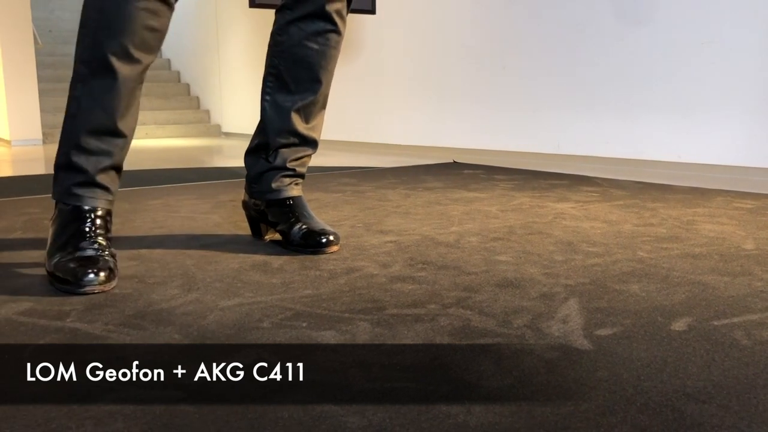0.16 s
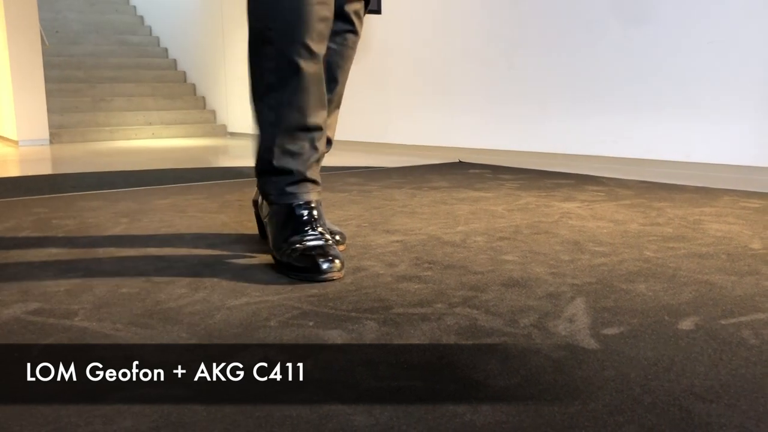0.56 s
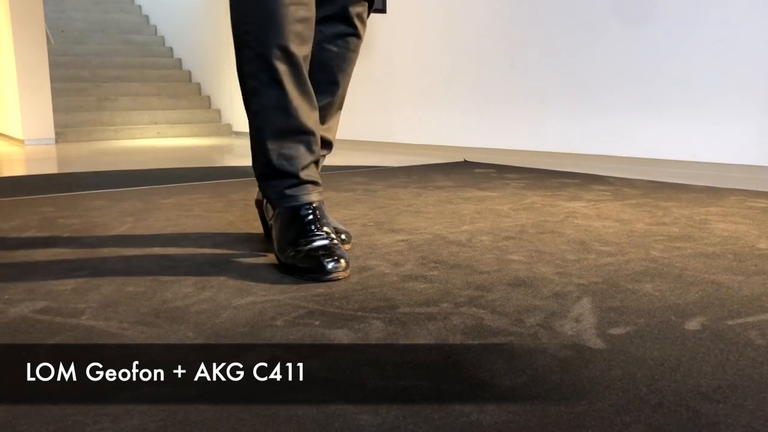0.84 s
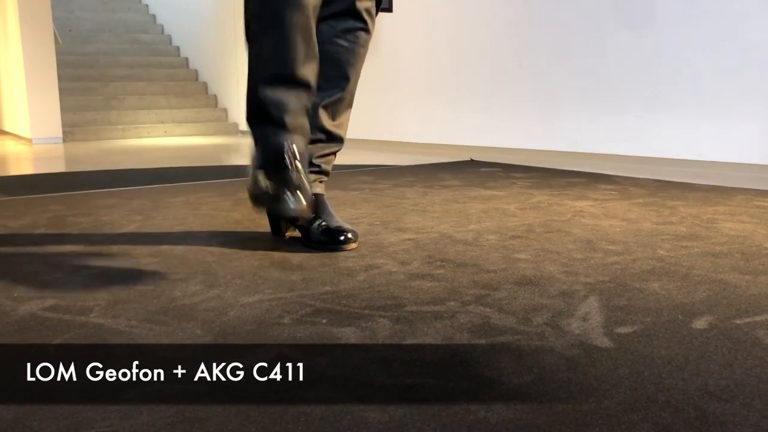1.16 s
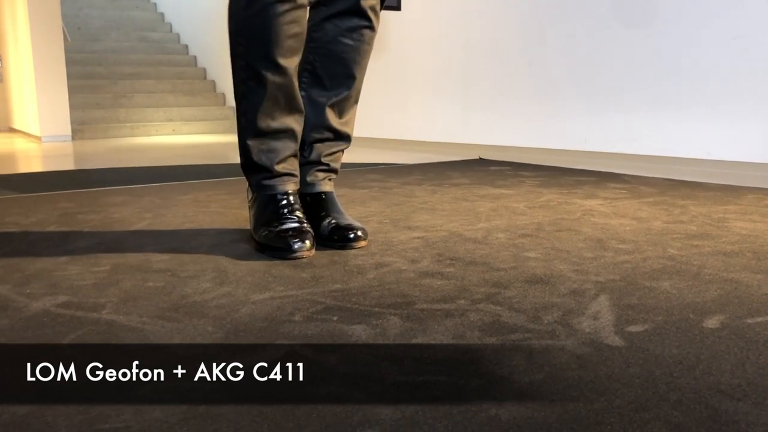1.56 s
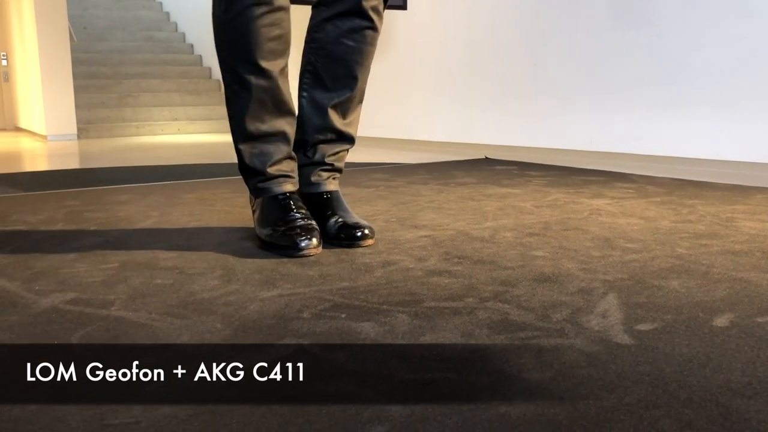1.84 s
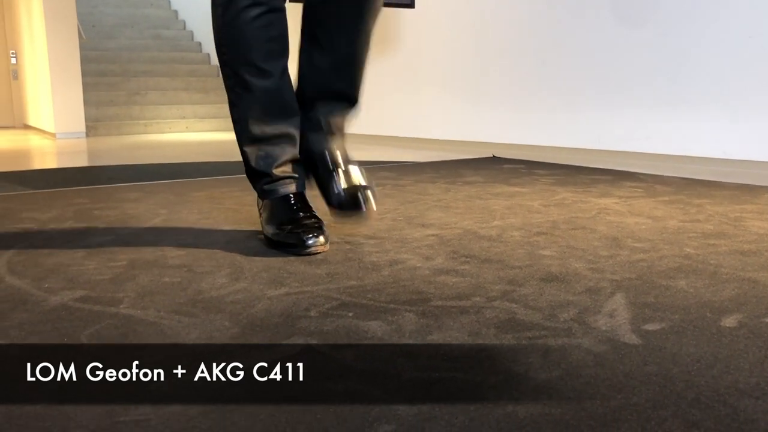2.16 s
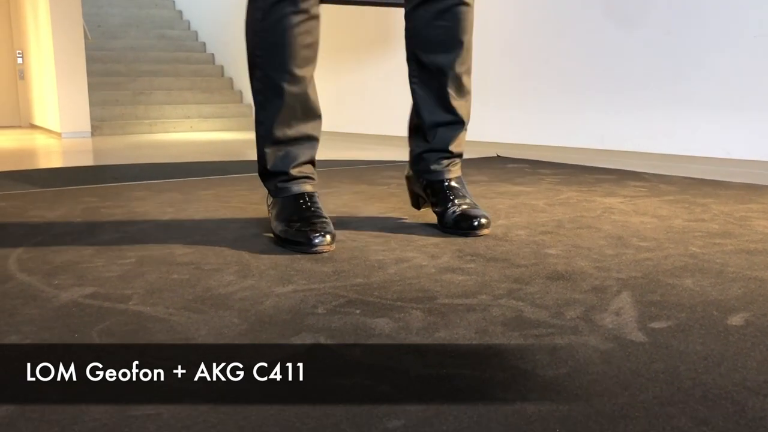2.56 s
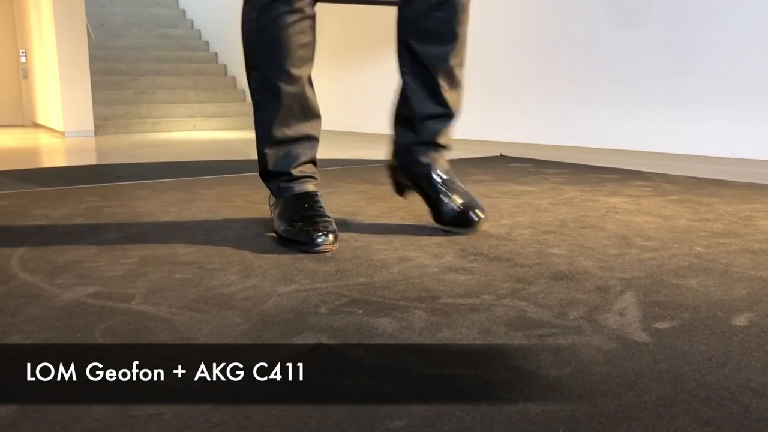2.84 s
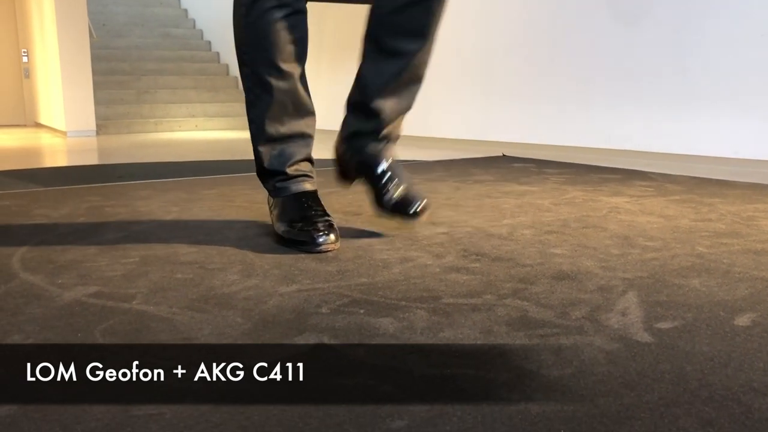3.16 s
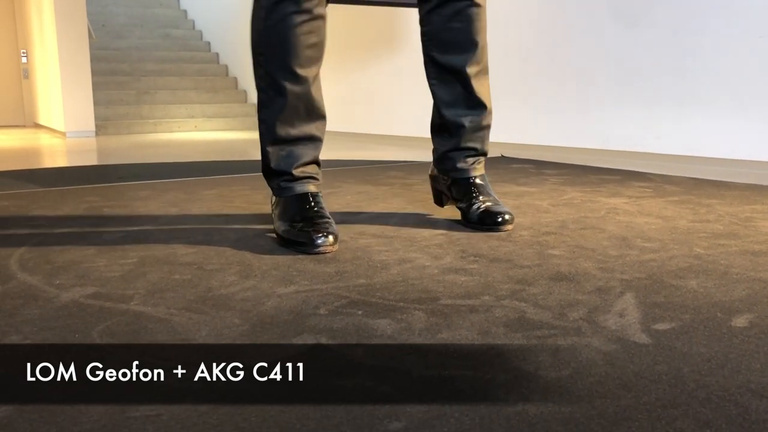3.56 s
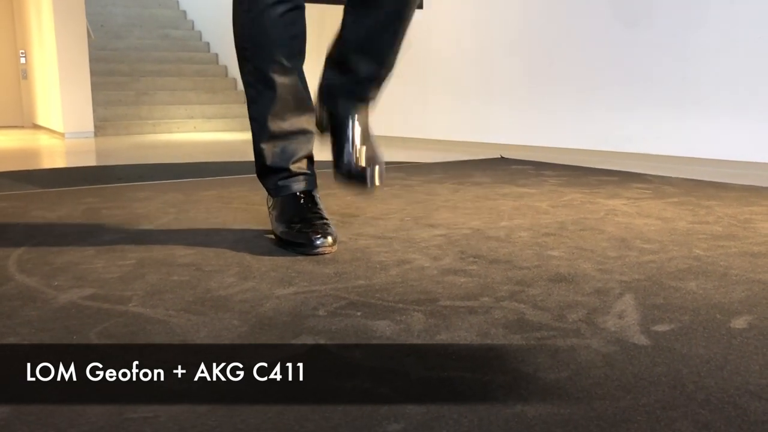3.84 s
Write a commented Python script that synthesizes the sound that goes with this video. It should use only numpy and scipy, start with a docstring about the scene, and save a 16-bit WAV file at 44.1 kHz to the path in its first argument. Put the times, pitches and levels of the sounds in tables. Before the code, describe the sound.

Seven forceful heel stamps on resonant boards, each a woody knock with clatter and a short booming tail, then small ticks, dull touches and soft scuffs; very close pickup, slight hall reflection, faint low rumble.

```python
"""In a hall, a dancer stamps hard-heeled shoes on a hollow wooden stage, heard close to the boards.
Each stamp is a pulse and short ringing modes in the wood, a bright crack a few ms later, and a boom
of swelling platform modes; banded noise with its own decay in each band gives clatter and hall.
Between stamps come lighter taps, ticks, dull heel touches, soft steps and sole scuffs, over a faint rumble."""
import sys
import numpy as np
from scipy import signal
from scipy.io import wavfile

SR = 44100
rng = np.random.default_rng(int(sys.argv[2]) if len(sys.argv) > 2 else 0)


def generate_wav(signal):
    """Clip the signal to [-1, 1] and save it as 16-bit WAV at the path in sys.argv[1]."""
    frames = np.transpose(np.atleast_2d(signal))
    scaled = np.clip(frames, -1, 1) * 32767
    pcm = np.round(scaled).astype(np.int16)
    wavfile.write(sys.argv[1], SR, pcm)


N = 176400
LEAD = SR // 4  # samples computed ahead of time zero, so that earlier blows still ring
TIME = np.arange(-LEAD, N) / SR

# All levels are relative. Decay times T60 are the time to fall by 60 dB.
# Stamps. Each row: start in seconds, knock level in dB, knock frequency in Hz, boom level in dB,
# board clatter level in dB, heel ring level in dB, heel ring pitch in Hz, crack delay in seconds,
# crack level in dB, hall level in dB, rebound level in dB, rebound delay in seconds.
STAMP_EVENTS = [(-.066, 5, 784, 2, -17.5, -30, 545, 0.019, 1, -6.5, -28.5, .126),
                (0.5667, -9, 972, 1, 0, -33.5, 747, 0.0081, -10.5, -3, -19, .083),
                (1.4252, -10, 1020, 2.5, 3, -31.5, 590, .0075, 1.5, -2.5, -25, .131),
                (2.2524, -13, 722, -0.5, -1.5, -25, 534, 0.0046, -2.5, -11.5, -24, 0.079),
                (2.5323, -17.5, 612, 1, 3.5, -21.5, 556.5, .005, 1.5, -3.5, -21.5, 0.081),
                (3.0733, -12.5, 773, 1, 0.5, -25, 547, .0072, 0.5, -8, -24.5, .082),
                (3.3643, -12.5, 900, 2.5, 2, -23.5, 548, 0.0047, 0, -4, -20, 0.077),
                (3.9325, -8, 1078, 3.5, 5, -33.5, 580, 0.0044, 0, 1.5, -22, .081)]
# Lighter taps as the sole settles. Each row: start in seconds, click level in dB, thud level in dB.
TAP_EVENTS = [(0.019, -33, -13.5), (0.031, -13.5, -13.5), (0.581, -7, -20.5), (.613, -25, -6),
              (.628, -17, -12.5), (1.497, -20, -14.5), (1.5227, -26, -14.5), (1.5311, -11, -9),
              (2.297, -12.5, -12), (3.112, -7, -15.5), (3.394, -6.5, -5)]
# Small ticks of the shoes. Each row: start in seconds, level in dB.
TICK_EVENTS = [(0.2623, -36), (0.471, -42), (.51, -45), (0.646, -24), (0.6665, -18), (0.783, -48),
               (0.8561, -44), (1.1522, -40), (1.509, -27.5), (1.7109, -44), (1.879, -45.5), (2.326, -36),
               (2.3594, -36), (2.618, -26), (2.815, -39), (3.149, -19), (3.176, -30.5), (3.453, -29),
               (3.4862, -33.5), (3.5123, -35.5), (3.6589, -37)]
# Light dull touches of the heel. Each row: start in seconds, level in dB.
TOUCH_EVENTS = [(1.8795, -10), (2.659, -1), (3.6184, -8)]
# Soft steps and shifts of weight. Each row: start in seconds, length in seconds, level in dB,
# board hum level in dB, hum frequency in Hz.
STEP_EVENTS = [(.243, .04, 0, -45, 186.8), (0.5, 0.055, -0.5, -47, 191.5), (1.025, 0.018, 4, -42.5, 159.6),
               (1.872, 0.0066, 3, -54.5, 157.2), (1.964, 0.017, 4.5, -37.5, 188.6),
               (1.995, 0.051, -4.5, -38, 156.2), (2.82, 0.034, 0, -61, 193.6),
               (3.623, 0.011, -13, -54.5, 195)]
# Scuffs of the sole. Each row: middle in seconds, half length in seconds, level in dB.
SCUFF_EVENTS = [(0.274, 0.011, -8.5), (1.033, 0.0137, 1), (1.993, 0.0076, -10.5), (2.848, 0.015, -9.5),
                (3.682, 0.01, -5.5)]

# Modes of the heel on the board. Each row: multiple of the ring pitch, level in dB, T60 in seconds.
HEEL_MODES = [(.61, -9, 0.055), (1, 2.5, 0.09), (1.24, -7.5, .05), (2.2, -5, 0.046)]
# Modes of the hollow platform. Each row: frequency in Hz, level in dB, T60 in seconds,
# swell time constant in seconds.
PLATFORM_MODES = [(30, -42, 0.19, 0.046), (54, -49, 0.12, 0.073), (74.22, -18, 0.4, 0.22),
                  (85, -24, 0.13, 0.0083), (97.53, -17.5, .29, 0.058), (130.3, -23.5, 0.087, 0.0011),
                  (122.53, -23.5, 0.24, 0.032), (156.47, -24.5, .29, 0.026), (197.8, -29.5, 0.28, 0.016),
                  (233, -29.5, 0.16, 0.0034), (281.8, -37.5, 0.28, 0.0037), (320.5, -42, 0.37, 0.0046),
                  (368, -39.5, 0.064, 0.0076), (488.1, -38.5, 0.16, .002)]
# Thin, faint tones that ring on after each stamp. Each row: frequency in Hz, level in dB, T60 in seconds.
RINGING_TONES = [(128.7, -54.5, 0.88), (163.6, -51.5, 0.71), (925, -79.5, 0.74), (990, -84, 0.93),
                 (1160, -81.5, 1.2)]
# Resonances of the shoe. Each row: frequency in Hz, width in Hz, level in dB.
SHOE_RESONANCES = [(2244, 180, -3), (2600, 510, -2.5), (2940, 49, 0), (3530, 15, -6.5), (4230, 140, -1),
                   (5260, 25, -10.5), (6290, 180, -1)]

# Spectrum of the clattering boards. Each row: frequency in Hz, level in dB, T60 in seconds.
BOARD_SPECTRUM = [(59.5, -51.5, 0.48), (148, -41.5, 0.74), (303, -38, 0.21), (556, -40.5, 0.18),
                  (1210, -44, 0.061), (1920, -49.5, 0.038), (3513, -69.5, 0.1), (6800, -83, 0.026),
                  (15000, -105, .03)]
# Spectrum of the snap of sole and rim. Each row: frequency in Hz, level in dB, T60 in seconds.
SNAP_SPECTRUM = [(500, -62.5, 0.011), (1500, -52.5, 0.017), (2780, -48.5, 0.016), (7040, -53, 0.012),
                 (8500, -58.5, 0.0042), (12000, -61, 0.0046), (14910, -76, .004)]
# Spectrum of the bright crack. Each row: frequency in Hz, level in dB, T60 in seconds.
CRACK_SPECTRUM = [(600, -64.5, .04), (1500, -52, 0.015), (4700, -53.5, .04), (6450, -61, .04),
                  (8100, -68, 0.05), (11540, -75.5, 0.055), (15000, -97.5, .025)]
# Spectrum of the hall's answer. Each row: frequency in Hz, level in dB, T60 in seconds.
HALL_SPECTRUM = [(400, -51.5, 0.042), (1200, -49, 0.18), (2550, -58, 0.027), (4501, -59, 0.079),
                 (7000, -65, 0.046), (10000, -82.5, 0.11), (12000, -84, .06), (15000, -108, .04)]
# Spectrum of the far, long tail. Each row: frequency in Hz, level in dB, T60 in seconds.
FAR_TAIL_SPECTRUM = [(82, -58, 1.6), (181, -63.5, 0.88), (327, -69, 0.31), (600, -80.5, 1.2),
                     (890, -88.5, 0.48), (1180, -85.5, 1.5), (6000, -114, 0.28)]
# Spectrum of a shoe tick. Each row: frequency in Hz, level in dB, T60 in seconds.
TICK_SPECTRUM = [(500, -70, .03), (1800, -56, 0.053), (3000, -52, 0.023), (4800, -52.5, 0.048),
                 (7620, -58.5, 0.0093), (10850, -91.5, 0.015), (14600, -104, .02)]
# Spectrum of a dull heel touch. Each row: frequency in Hz, level in dB, T60 in seconds.
TOUCH_SPECTRUM = [(144, -63, 0.18), (357, -42, 0.059), (704, -69, 0.019), (3050, -105, 0.02)]
# Spectrum of a soft step. Each row: frequency in Hz, level in dB, T60 in seconds.
STEP_SPECTRUM = [(30, -67, .2), (77, -57, .2), (161, -47.5, 0.11), (278, -59.5, 0.11), (432, -77, .07),
                 (800, -94, 0.027), (1502, -104, 0.044), (5840, -125, 0.045)]
# Spectrum of a scuff. Each row: frequency in Hz, level in dB, T60 in seconds.
SCUFF_SPECTRUM = [(158, -67.5, 0.017), (473, -78, 0.12), (1350, -76.5, 0.0065), (2650, -89.5, 0.016),
                  (6200, -93, 0.018), (9000, -106.5, 0.034), (15000, -120, 0.022)]
# Spectrum of the steady rumble. Each row: frequency in Hz, level in dB, T60 in seconds.
RUMBLE_SPECTRUM = [(25, -75.5, 0.01), (70, -69.5, .02), (360, -88, 0.014), (990, -109, 0.018),
                   (14770, -130, 0.018)]

PULSE_CENTRE_S = 0.02  # the smooth pulses peak or cross zero this far in
KNOCK_BODY_RATIO, KNOCK_BODY_DB = 0.37, -14.5  # slower flex of the board under the heel
KNOCK_EDGE_RATIO, KNOCK_EDGE_DB = 2.1, -15.5  # the hard rim of the heel
BOARD_END_S, BOARD_END_DB = 0.0021, -12  # the knock returns from the end of the board, inverted
HEEL_SWELL_S = 0.002
MODE_SPREAD_DB = 1.2  # standard deviation of the platform modes; the heel modes take twice this
RING_SPREAD_DB = 2  # standard deviation of the long ringing tones
SOLE_S, SOLE_HZ, SOLE_DB = 0.0165, 132, -25.5  # the weight follows the heel and presses the board down
REBOUND_HZ = 68.6  # the platform dips a second time under the weight
FLUTTER_S, FLUTTER_LOSS_DB = 0.039, 6.5  # and again at this spacing, weaker each time
TAP_BOARDS_DB = -1.5  # added to a tap's thud level for the clatter of the boards
TAP_SNAP_DB = -17  # added to a tap's click level for its snap
RIM_SNAP_DB, RIM_SNAP_GROWTH = 22.5, 3.6  # the rim clicks far more on hard knocks (dB per dB)
RATTLES_PER_S, RATTLE_DB, RATTLE_SPREAD_DB = 91, -13, 5.5  # the shoe chatters after the crack
RATTLE_FADE_DB_PER_S = 202.5
GRAIN_DB, GRAIN_S = 2.0, 0.0008  # unevenness of cracks and hall; spacing of all unevenness
HALL_HOLD_S = 0.034  # early reflections keep coming this long
ECHO_S, ECHO_DB = 0.044, -5  # a distinct reflection in the hall
HUM_T60_S, HUM_SWELL_S = 0.24, 0.02  # the swell also serves the long ringing tones
HUM_LOWER_RATIO, HUM_LOWER_DB = 0.79, -5  # a second, lower board mode beats with the hum
GRIT_DB = 6.5  # unevenness of a scuff
CUTOFF_HZ = 16200


def knocks():
    """Impact: a pulse of flexure, its inverted reflection, and heel modes excited in varying proportion."""
    out = np.zeros(len(TIME))
    for s, db, hz, _, _, ring_db, ring_hz, *_ in STAMP_EVENTS:
        body = from_db(KNOCK_BODY_DB) * flex(hz * KNOCK_BODY_RATIO)
        edge = from_db(KNOCK_EDGE_DB) * flex(hz * KNOCK_EDGE_RATIO)
        pulse = flex(hz) + body + edge
        pulse_start = s - PULSE_CENTRE_S
        add(out, pulse_start, from_db(db) * pulse)
        add(out, pulse_start + BOARD_END_S, -from_db(db + BOARD_END_DB) * pulse)
        for ratio, mode_db, t60 in HEEL_MODES:
            level_db = ring_db + mode_db + 2 * MODE_SPREAD_DB * rng.standard_normal()
            add(out, s, from_db(level_db) * mode(ring_hz * ratio, t60, HEEL_SWELL_S))
    return out


def boom():
    """Modal superposition: platform modes swell and beat after each blow; stamps rebound and ring on."""
    out = np.zeros(len(TIME))
    shapes = np.array([from_db(db) * mode(hz, t60, swell) for hz, db, t60, swell in PLATFORM_MODES])
    stamp_blows = [(row[0], row[3]) for row in STAMP_EVENTS]
    tap_blows = [(s, thud_db) for s, _, thud_db in TAP_EVENTS]
    for s, db in stamp_blows + tap_blows:
        mix_db = db + MODE_SPREAD_DB * rng.standard_normal(len(shapes))
        add(out, s, from_db(mix_db) @ shapes)

    rings = np.array([from_db(db) * mode(hz, t60, HUM_SWELL_S) for hz, db, t60 in RINGING_TONES])
    for s, _, _, boom_db, *_, rebound_db, delay in STAMP_EVENTS:
        ring_mix_db = boom_db + RING_SPREAD_DB * rng.standard_normal(len(rings))
        add(out, s, from_db(ring_mix_db) @ rings)
        pulse_start = s - PULSE_CENTRE_S
        add(out, pulse_start + SOLE_S, from_db(boom_db + SOLE_DB) * flex(SOLE_HZ))
        for k in range(3):
            level = from_db(rebound_db - k * FLUTTER_LOSS_DB)
            add(out, pulse_start + delay + k * FLUTTER_S, level * bounce(REBOUND_HZ))
    return out


def shoe_cracks():
    """Contact noise: rim and sole snap, crack and rattle, coloured by the resonances of the shoe."""
    s, knock_db, _, _, _, _, _, delay, crack_db, hall_db, _, _ = np.transpose(STAMP_EVENTS)
    tap_s, click_db, _ = np.transpose(TAP_EVENTS)
    crack_s = s + delay
    rim_db = RIM_SNAP_DB + RIM_SNAP_GROWTH * knock_db
    snap_db = np.r_[rim_db, crack_db, click_db + TAP_SNAP_DB]
    snap_power = clicks(np.r_[s, crack_s, tap_s], from_db(snap_db) ** 2)
    snaps = wash(snap_power + rattle(crack_s, hall_db), SNAP_SPECTRUM)
    cracks = struck(np.r_[crack_s, tap_s], np.r_[crack_db, click_db], CRACK_SPECTRUM, GRAIN_DB)
    return coloured(snaps + cracks, SHOE_RESONANCES)


def rattle(starts, levels_db):
    """Intermittent contact: the power of random small impacts that die away after each crack."""
    fade = np.zeros(len(TIME))
    for s, db in zip(starts, levels_db):
        fade += from_db(db - RATTLE_FADE_DB_PER_S * np.abs(TIME - s)) * (TIME > s)
    contacts = rng.random(len(TIME)) < RATTLES_PER_S / SR
    sizes_db = RATTLE_DB + RATTLE_SPREAD_DB * rng.uniform(-1.7, 1, len(TIME))
    return (contacts * fade * from_db(sizes_db)) ** 2


def board_clatter():
    """Dense modal response: stamps and taps set the boards clattering, the treble mostly dying sooner."""
    s, boards_db = np.transpose(STAMP_EVENTS)[[0, 4]]
    tap_s, _, thud_db = np.transpose(TAP_EVENTS)
    return struck(np.r_[s, tap_s], np.r_[boards_db, thud_db + TAP_BOARDS_DB], BOARD_SPECTRUM)


def footwork():
    """Weak excitation: ticks, heel touches, soft steps that set a board humming, and gritty friction."""
    step_power = sum(held(s, length, db) for s, length, db, _, _ in STEP_EVENTS)
    steps = wash(step_power, STEP_SPECTRUM)
    for s, _, _, db, hz in STEP_EVENTS:
        add(steps, s, from_db(db) * mode(hz, HUM_T60_S, HUM_SWELL_S))
        lower = mode(hz * HUM_LOWER_RATIO, HUM_T60_S, HUM_SWELL_S)
        add(steps, s, from_db(db + HUM_LOWER_DB) * lower)
    slide = sum(from_db(db) ** 2 * np.exp(-((TIME - s) / half) ** 2) for s, half, db in SCUFF_EVENTS)
    scuffs = wash(slide / 100, SCUFF_SPECTRUM, GRIT_DB)
    ticks = struck(*np.transpose(TICK_EVENTS), TICK_SPECTRUM)
    touches = struck(*np.transpose(TOUCH_EVENTS), TOUCH_SPECTRUM)
    return steps + coloured(ticks + scuffs, SHOE_RESONANCES) + touches


def hall_answer():
    """Reverberation: early reflections, a distinct echo and a long far tail, each a decaying noise."""
    s, boom_db, delay, hall_db = np.transpose(STAMP_EVENTS)[[0, 3, 7, 9]]
    crack_s = s + delay
    early = sum(held(start, HALL_HOLD_S, db) for start, db in zip(crack_s, hall_db))
    echo = clicks(crack_s + ECHO_S, from_db(hall_db + ECHO_DB) ** 2)
    hall = wash(early + echo, HALL_SPECTRUM, GRAIN_DB)
    # the shoe's resonances colour the answer as they colour the crack
    return coloured(hall, SHOE_RESONANCES) + struck(s, boom_db, FAR_TAIL_SPECTRUM)


def rumble():
    """Stationary noise: constant power feeds a mostly low spectrum."""
    return wash(np.ones(len(TIME)) / 100, RUMBLE_SPECTRUM)


def flex(hz):
    """Flexure: the board dips under a blow and springs back in one smooth three-lobed pulse."""
    u = (np.pi * hz * (np.arange(SR // 25) / SR - PULSE_CENTRE_S)) ** 2
    return (2 * u - 1) * np.exp(-u)


def bounce(hz):
    """Rebound: the platform sinks and lifts once in a smooth down-and-up pulse."""
    u = np.pi * hz * (np.arange(SR // 25) / SR - PULSE_CENTRE_S)
    return (3 * u - 2 * u ** 3) * np.exp(-u ** 2)


def mode(hz, t60, swell):
    """Damped oscillation: one second of a sine that swells and dies exponentially."""
    t = np.arange(SR) / SR
    return np.sin(2 * np.pi * hz * t) * from_db(-60 * t / t60) * (1 - np.exp(-t / swell))


def wash(power, spectrum, grain_db=0):
    """High modal density: half-octave noise bands, fed by the given power, each decay at their own rate."""
    hz, db, t60 = np.transpose(spectrum)
    knots = np.arange(TIME[0], TIME[-1], GRAIN_S)
    grain = np.interp(TIME, knots, rng.standard_normal(len(knots)))
    # neighbouring bands use different noise
    white = rng.standard_normal((2, len(TIME))) * from_db(grain_db * grain)
    out = np.zeros(len(TIME))
    edges = 22 * 2 ** (np.arange(20) / 2)
    for k, (low, high) in enumerate(zip(edges, edges[1:])):
        centre = np.log(low * high) / 2
        # power kept per sample: -60 dB after T60, hence -120 on an amplitude scale
        keep = from_db(-120 / (np.interp(centre, np.log(hz), t60) * SR))
        stored_power = signal.lfilter([1], [1, -keep], power + 1e-18)
        level = np.sqrt(stored_power) * from_db(np.interp(centre, np.log(hz), db))
        band = signal.butter(2, [low, high], "band", fs=SR, output="sos")
        out += signal.sosfilt(band, level * white[k % 2])
    return out * np.sqrt(SR / 200)


def struck(times, db, spectrum, grain_db=0):
    """Impulsive excitation: dense resonances set off by blows."""
    return wash(clicks(times, from_db(db) ** 2), spectrum, grain_db)


def coloured(x, peaks):
    """Resonance: narrow peaks stand out of a broad sound."""
    out = x.copy()
    for hz, width, db in peaks:
        out += from_db(db) * signal.lfilter(*signal.iirpeak(hz, hz / width, fs=SR), x)
    return out


def held(s, length, db):
    """Sustained excitation: the power of one blow spread evenly over a stretch of time."""
    return from_db(db) ** 2 * ((TIME >= s) & (TIME < s + length)) / (length * SR)


def clicks(times, sizes):
    """Ideal impulses: one sample per event."""
    out = np.zeros(len(TIME))
    at = (np.asarray(times) * SR).astype(int) + LEAD
    np.add.at(out, np.clip(at, 0, len(out) - 1), sizes)
    return out


def add(out, s, sound):
    """Superposition: mix a sound in from time s."""
    i = max(int(s * SR) + LEAD, 0)
    out[i:i + len(sound)] += sound[:max(len(out) - i, 0)]


def from_db(db):
    """Logarithmic level: decibels to an amplitude ratio."""
    return 10 ** (np.asarray(db) / 20)


def scene():
    """Superposition of all sources, from time zero on."""
    stamps = knocks() + boom() + shoe_cracks() + board_clatter()
    return (stamps + footwork() + hall_answer() + rumble())[None, LEAD:]


def record(dry):
    """Band limitation: a steep low-pass removes the top of the spectrum."""
    return signal.sosfilt(signal.cheby2(12, 70, CUTOFF_HZ, fs=SR, output="sos"), dry)


dry = scene()
out = record(dry)
generate_wav(out)
```